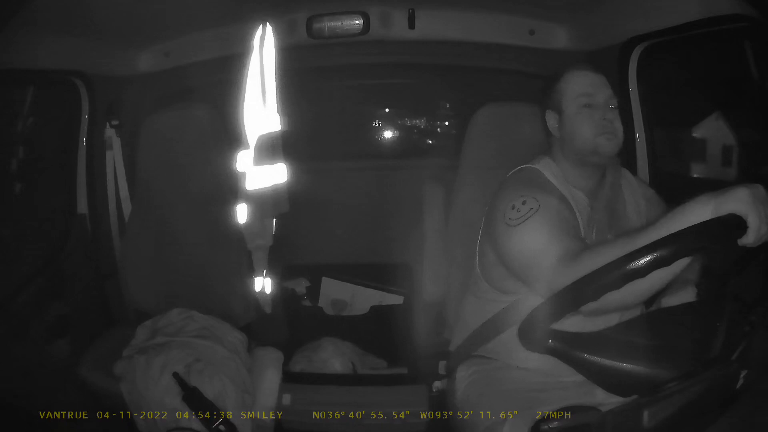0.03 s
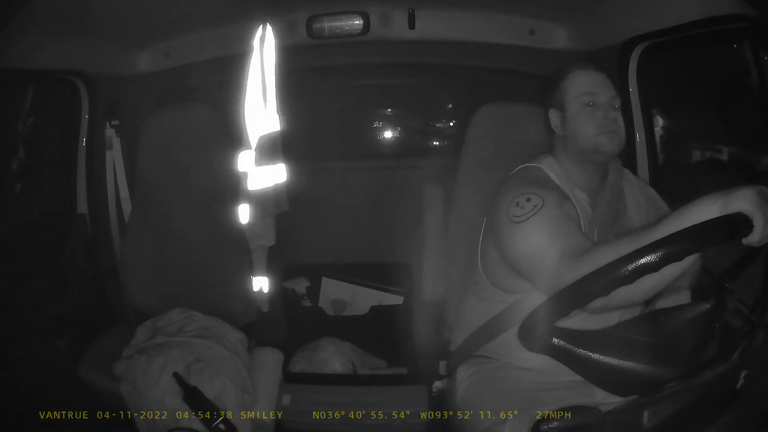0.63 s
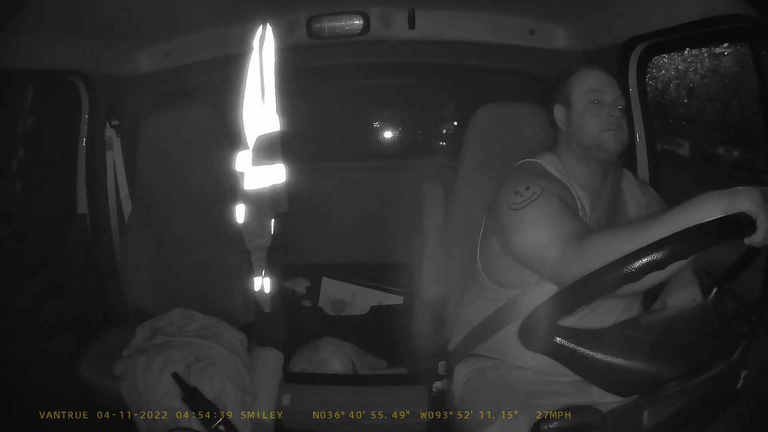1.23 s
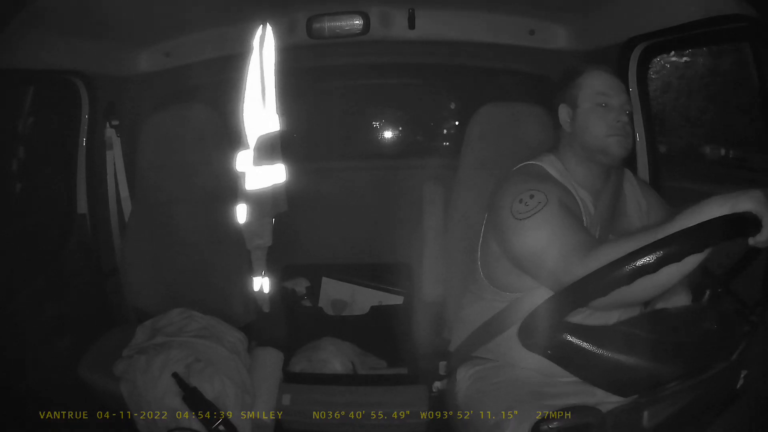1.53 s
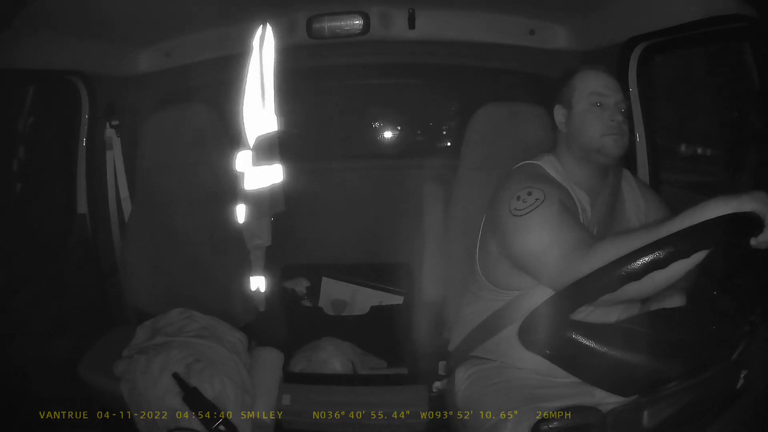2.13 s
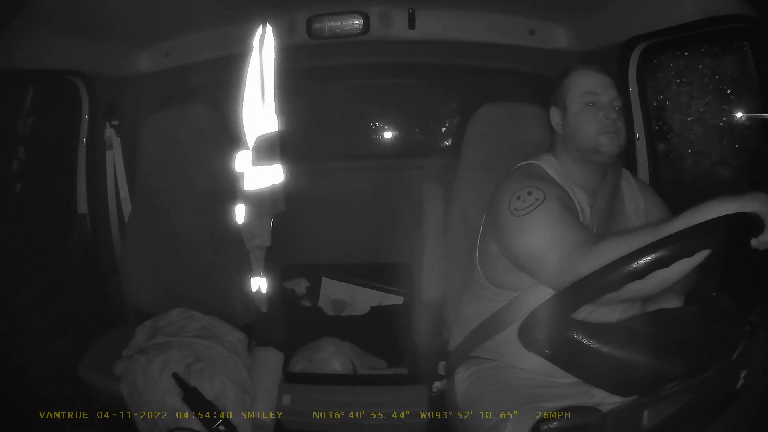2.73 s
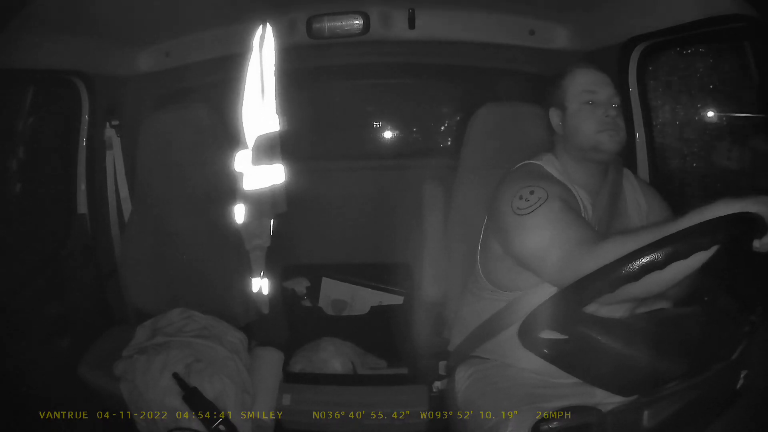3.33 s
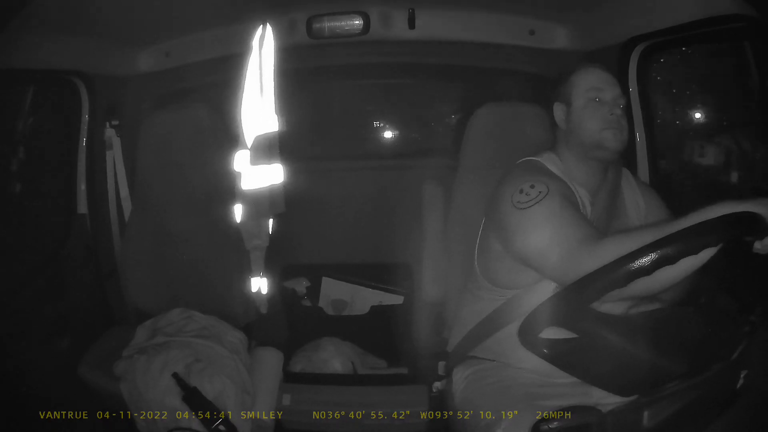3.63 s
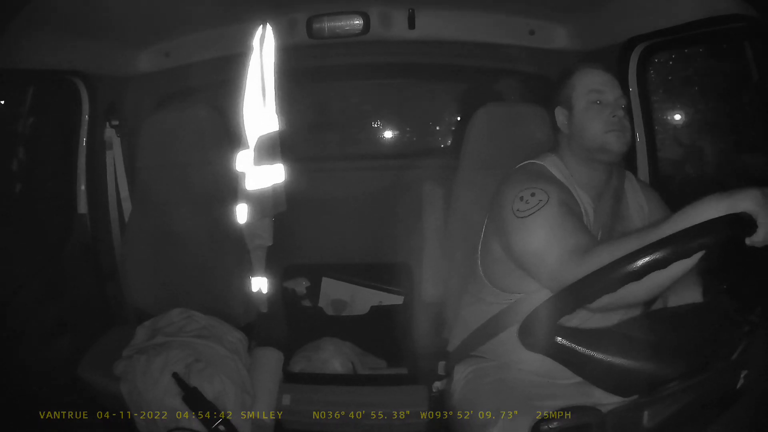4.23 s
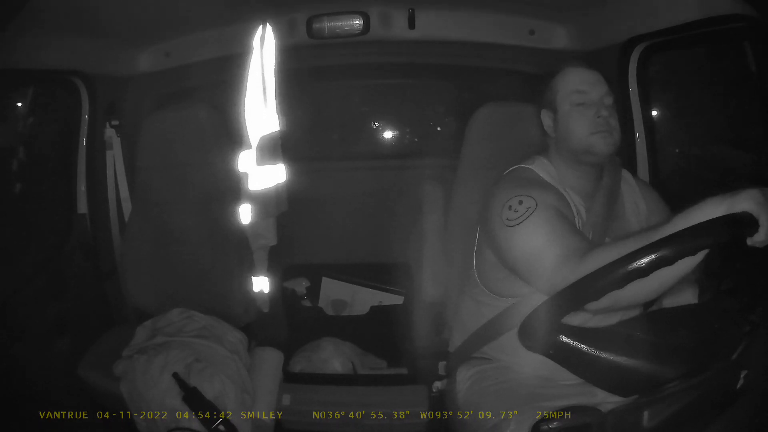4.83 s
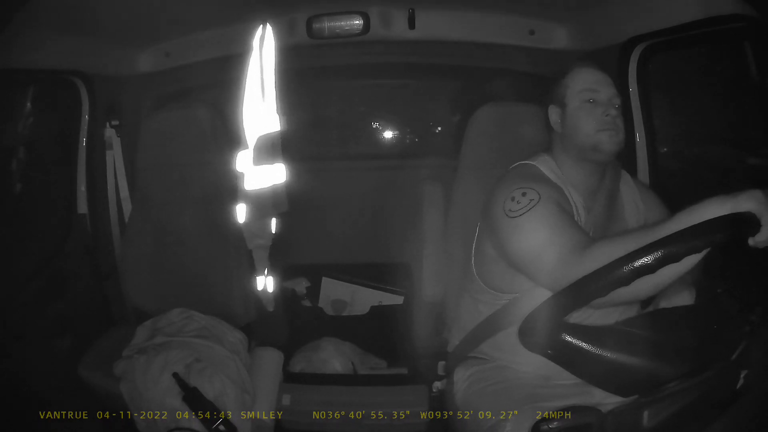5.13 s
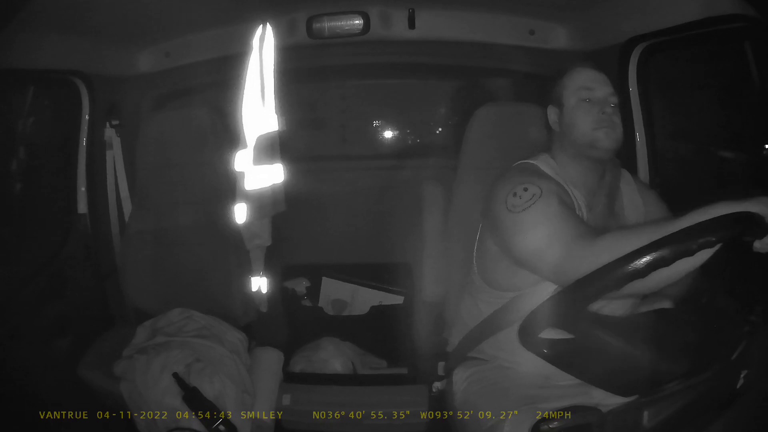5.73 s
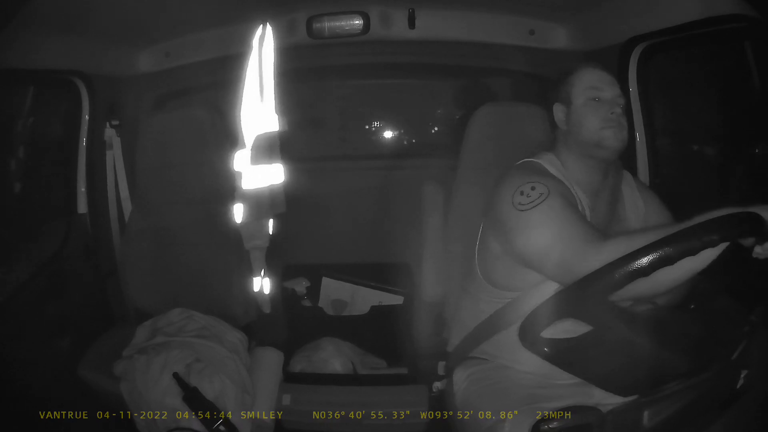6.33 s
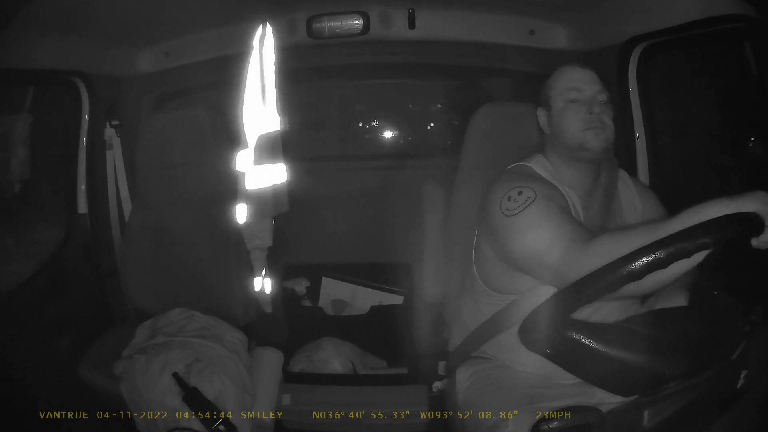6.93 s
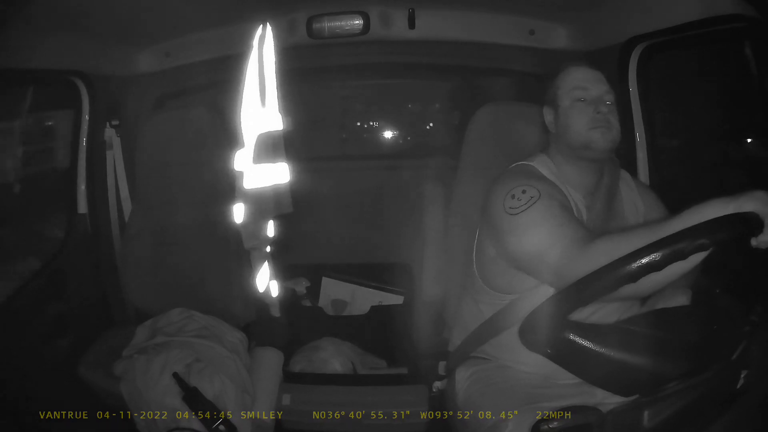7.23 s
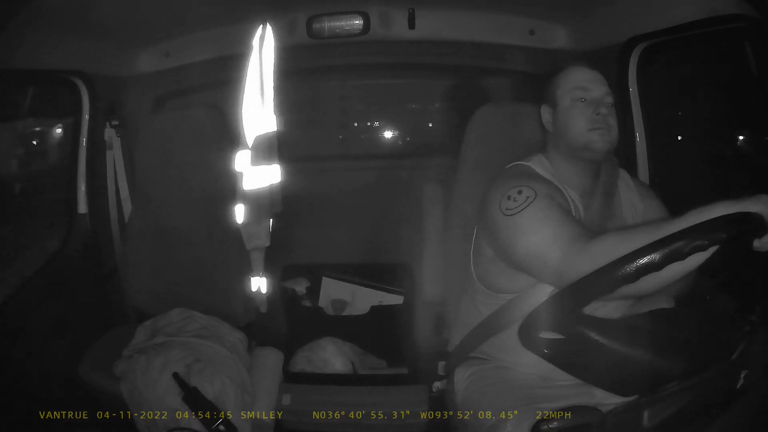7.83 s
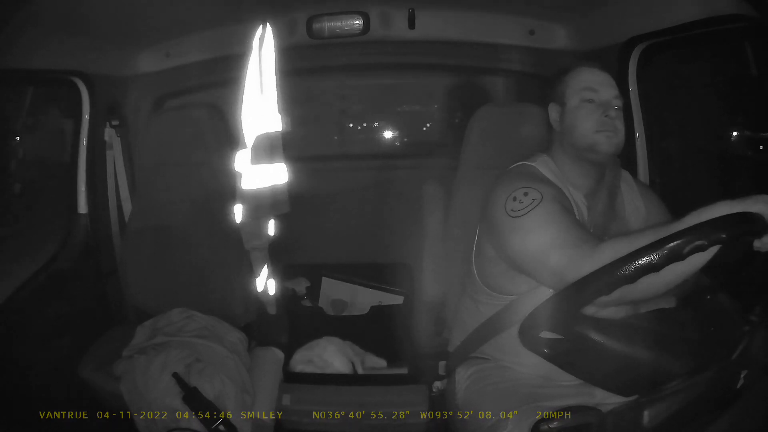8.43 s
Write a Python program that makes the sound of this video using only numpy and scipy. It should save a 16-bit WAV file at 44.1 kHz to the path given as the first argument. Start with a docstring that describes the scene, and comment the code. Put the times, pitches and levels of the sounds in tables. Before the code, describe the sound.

Inside a slowly moving diesel truck, a deep cab boom, a low engine drone and tyre roar with light hiss run for the whole eight and a half seconds. A turn signal goes tick-tock throughout, one dull click a little more often than every half second. Road bumps swell the rumble repeatedly, with the strongest thud at about 3 seconds. The engine note sags slightly, then steps up in a downshift at about 3.2 seconds and slowly falls afterwards. A small dry plastic knock comes at 2.9 seconds, a much sharper one at 3.3, and light ones near 7.3. Loose trim patters faintly all along, with tiny high squeaks around 0.5 and 8.2 seconds. At about 6.5 seconds the hiss and patter ease as the driver lifts off. A very faint blower hum lies underneath, and the space sounds close and padded.

```python
"""Truck cab in a night turn

Inside a diesel truck that rolls slowly through a turn and changes down one gear. The road makes
the cab boom under the engine's drone and the roar of the tyres; the turn signal goes tick-tock.
Loose trim patters, knocks and squeaks, and the hiss eases near the end as the driver lifts off."""
import sys
import numpy as np
from scipy import signal
from scipy.fft import rfft, irfft, next_fast_len
from scipy.io import wavfile
from scipy.ndimage import uniform_filter1d

SR = 44100
rng = np.random.default_rng(int(sys.argv[2]) if len(sys.argv) > 2 else 0)


def bounce(signal):
    """Save signal as a 16-bit WAV file at the path given by the first command-line argument."""
    frames = np.transpose(np.atleast_2d(signal))
    limited = np.clip(frames, -1, 1)
    pcm = np.round(limited * 32767).astype(np.int16)
    wavfile.write(sys.argv[1], SR, pcm)


N = 378819
TIME = np.arange(N) / SR

# Engine firing rate, jumping up at the downshift: t/s, f/Hz
FIRING_RATE = [(0, 60), (1, 59.54), (2, 58.03), (2.7, 56.3), (3.1, 54.55), (3.35, 76.26), (4.3, 74.8),
               (5, 73.8), (6, 70.4), (6.6, 66.04), (7.3, 61.85), (8, 59.13), (8.6, 59.75)]
# Bumps in the road: t/s, relative air boom/dB, relative frame thud/dB, length/s
ROAD_BUMPS = [(0.254, -35, -51, 0.13), (0.917, -32.5, -46, 0.18), (1.567, -31.5, -46, 0.15),
              (2.176, -31.0, -39, 0.2), (2.75, -30, -40, 0.099), (3.052, -29, -32.5, 0.18),
              (3.556, -35.0, -43, 0.14), (4.11, -36.5, -48, 0.24), (4.994, -32.5, -40, 0.1),
              (6.47, -35.5, -49, 0.23), (7.75, -32, -42.0, 0.18), (8.23, -31.5, -48, 0.14),
              (8.427, -31, -46.0, 0.14)]
# Spectrum of the bright hiss and squeak scrape: f/Hz, relative level/dB
HISS_EQ = [(1000, -9.5), (2250, -3), (2600, -1.5), (2820, -0.5), (2990, 2.5), (3250, -1.5), (3500, -1.5),
           (4100, -4.5), (5250, -8), (5600, -8), (6300, -14.5), (6900, -25.5), (10000, -36), (16000, -54)]
# Bright spectrum of brushing and knock cracks: f/Hz, relative level/dB
BRIGHT_EQ = [(1500, -5), (4000, 3), (7500, -3.5), (11000, -10), (16000, -12)]


def cab_rumble(shake_db, boom_trim_db=-1.43, panel_db=-46, thud_db=-51, jolt_trim_db=-3):
    """The road shakes the cab's air, frame and panels; the panels also follow the engine."""
    # Spectra of air boom, panel drone and frame thud: f/Hz, relative level/dB
    boom_eq = [(15, -33), (35, -27), (55, -28.5), (78, -17.5), (95, -20), (113, 1), (128, 4), (148, -2.5),
               (168, -6), (190, -22), (260, -46), (500, -76)]
    panel_eq = [(120, -15), (180, -6.5), (212, 1), (240, -1.5), (315, -1), (345, -5.5), (370, -4),
                (420, -9), (470, -13.5), (497, -16), (600, -19), (1200, -64)]
    thud_eq = [(20, -33), (55, -27), (85, -7.5), (108, 4.5), (120, -3), (140, -23), (300, -68),
               (1000, -120)]
    boom = noise(boom_eq)
    boom /= np.sqrt(uniform_filter1d(boom ** 2, size=2000))  # the road alone sets the slow swell
    load_db, revs_db = effort_db(), 20 * np.log10(curve(FIRING_RATE))
    engine_db = 0.2 * (load_db - load_db.mean()) + 0.57 * (revs_db - revs_db.mean())
    road_db = 0.22 * (shake_db - shake_db.mean())
    panels = noise(panel_eq) * gain_of(panel_db + road_db + engine_db + 0.76 * wander(25))
    jolts = swells([(s, db + jolt_trim_db, length) for s, _, db, length in ROAD_BUMPS])
    thud = noise(thud_eq) * np.hypot(gain_of(thud_db), jolts)
    return boom * gain_of(shake_db + boom_trim_db) + panels + thud


def road_shake_db(bed_db=-38.5, waver_db=2.8, bump_trim_db=-0.7):
    """How hard the road shakes the cab: a bed of unevenness with single bumps on top."""
    uneven = gain_of(bed_db + waver_db * wander(30))
    bumps = swells([(s, db + bump_trim_db, length) for s, db, _, length in ROAD_BUMPS])
    return 20 * np.log10(np.hypot(uneven, bumps))


def engine(gain_db=-49, waver_db=2.5):
    """Low orders of the six cylinders; each swells as it crosses the cab's boom."""
    # Engine orders: multiple of the firing rate, level/dB ahead of the cab's resonance
    orders = [(1 / 3, -1), (1, -1.5), (2, -3), (2.5, -7), (3, -10), (3.5, -2), (4, -13), (5, -12), (6, -8)]
    # The cab's resonance: f/Hz, gain/dB
    cab_eq = [(20, -18), (60, -12), (80, -2), (120, 0.5), (160, 11.5), (200, -1.5), (350, 0), (500, -12.5)]
    firing_hz = curve(FIRING_RATE)
    firings = np.cumsum(firing_hz * (1 + 0.003 * wander(10))) / SR
    drone = np.zeros(N)
    for order, db in orders:
        level = gain_of(db + eq_db(cab_eq, order * firing_hz) + waver_db * wander(6))
        drone += level * np.sin(2 * np.pi * (order * firings + rng.random()))
    return gain_of(gain_db) * drone


def effort_db(sink_db_per_s=0.24, lift_at_s=6.5, lift_length_s=0.16, lift_db=3):
    """The engine's effort sinks slowly from 0 dB, then drops as the driver lifts off."""
    lifted = np.clip((TIME - lift_at_s) / lift_length_s, 0, 1)
    return -sink_db_per_s * TIME - lift_db * lifted


def roar_and_hiss(roar_db=-50.5, hiss_db=-62, swell_db=0.5):
    """The tyres' roar and a bright hiss swell and flutter with the road's grain, and ease with the engine's
    effort."""
    # Spectrum of the tyre roar: f/Hz, relative level/dB
    roar_eq = [(400, -20), (495, -4.5), (525, 0.5), (600, 0), (690, -6.5), (765, -0.5), (800, -5),
               (850, -3), (930, -6), (1190, -7), (1510, -14), (2030, -15), (2230, -31), (3200, -44)]
    flutter = wander(45) + 0.65 * wander(130)
    swell = swell_db * wander(8)
    roar = noise(roar_eq) * gain_of(roar_db + 0.31 * effort_db() + swell + 1.37 * flutter)
    hiss = noise(HISS_EQ) * gain_of(hiss_db + effort_db() + 0.47 * swell + 1.06 * flutter)
    return roar + hiss * gain_of(1.26 * wander(150))


def turn_signal(first_s=0.1305, blink_s=0.8535):
    """The turn signal closes with a tick and opens with a tock half a blink later."""
    # Ringing modes of each stroke: f/Hz, relative level/dB, t60/s
    tick_modes = [(257, -14, 0.048), (465, -4, 0.1), (544, 6.5, 0.047), (627, -7.5, 0.041),
                  (840, -12, 0.028)]
    tock_modes = [(322, -5, 0.047), (456, 2, 0.055), (504, 7.5, 0.035), (582, -9, 0.055),
                  (967, -3.5, 0.032)]
    closes = np.arange(first_s, N / SR, blink_s)
    opens = np.arange(first_s + blink_s / 2, N / SR, blink_s)
    ticks = signal_clicks(closes, tick_modes, gain_db=-35.8, rise_s=0.0018, echo_s=0.0105, echo_db=-8)
    tocks = signal_clicks(opens, tock_modes, gain_db=-38.6, rise_s=0.003, echo_s=0.0135, echo_db=-6)
    return ticks + tocks


def signal_clicks(times, modes, gain_db, rise_s, echo_s, echo_db):
    """Ringing strokes, dulled by the dashboard and thrown back by the rear wall."""
    t = np.arange(SR // 6) / SR
    ring = sum(gain_of(db - 60 * t / t60) * np.sin(2 * np.pi * hz * t) for hz, db, t60 in modes)
    ring *= 1 - np.exp(-t / rise_s)
    clicks = np.zeros(N)
    for s in times:
        add(clicks, s, gain_of(gain_db) * ring)
        add(clicks, s + echo_s, gain_of(gain_db + echo_db) * ring)
    return cab_reverb(clicks, t60=0.26, wet_db=-15)


def trim_knocks(body_db=-34, body_t60=0.03, crack_db=-47, crack_t60=0.006):
    """Dry plastic knocks: a bright crack over a short burst coloured by the loose trim."""
    # Knocks: t/s, relative level/dB
    hits = [(2.882, -14), (3.3185, -0.5), (6.527, -23), (7.332, -21), (7.343, -14)]
    # The trim's resonance: f/Hz, relative level/dB
    trim_eq = [(300, -18), (750, -8), (1050, 14), (1500, -1), (2100, 4.5), (3000, -9.5), (4200, -14),
               (5500, -30), (7200, -39), (9000, -42), (15000, -44)]
    t = np.arange(4096) / SR
    blows, cracks = np.zeros(N), np.zeros(N)
    for s, db in hits:
        add(blows, s, rng.standard_normal(len(t)) * gain_of(body_db + db - 60 * t / body_t60))
        bright = coloured(rng.standard_normal(len(t)), BRIGHT_EQ)
        add(cracks, s, bright * gain_of(crack_db + db - 60 * t / crack_t60))
    body = coloured(blows, trim_eq) * blows.std()
    return cab_reverb(body + cracks, t60=0.11, wet_db=-9)


def trim_patter(clicks_per_s=160, spread_db=4, bed_db=-70, flurry_trim_db=3):
    """Many tiny rattles of loose trim, now and then swelling into a flurry."""
    # Flurries: t/s, relative level/dB, length/s
    flurries = [(.6, -61, .05), (1.37, -58.5, .03), (3.07, -64, .05), (4.785, -60, .03), (6.495, -63, .03)]
    # Spectrum of the rattle: f/Hz, relative level/dB
    rattle_eq = [(300, -14), (900, 3), (2000, 7.5), (2250, 3.5), (3000, 0.5), (5500, -15), (7000, -24),
                 (16000, -38)]
    strength = gain_of(spread_db * np.minimum(rng.exponential(1, N), 2)) * rng.choice([-1, 1], N)
    strikes = rng.random(N) < clicks_per_s / SR
    clicks = cab_reverb(strength * strikes, t60=0.011, wet_db=-2.5)
    level = gain_of(bed_db + effort_db()) + gain_of(flurry_trim_db) * swells(flurries)
    return coloured(clicks, rattle_eq) * level


def trim_squeaks(scrape_db=-10):
    """Short slips of the trim: a narrow tone with a little scrape."""
    # Slips: t/s, level/dB, f/Hz, length/s
    slips = [(0.513, -48, 2450, 0.012), (7.346, -55, 2430, 0.025), (8.196, -48.5, 2460, 0.023)]
    squeaks = np.zeros(N)
    for s, db, hz, length in slips:
        t = np.arange(0, length, 1 / SR)
        scrape = coloured(rng.standard_normal(4096), HISS_EQ)[:len(t)]
        tone = np.sin(2 * np.pi * hz * t) + gain_of(scrape_db) * scrape
        add(squeaks, s - length / 2, gain_of(db) * np.hanning(len(t)) * tone)
    return cab_reverb(squeaks, t60=0.085, wet_db=-9)


def brushing():
    """Brief, soft, bright brushing close by."""
    # Strokes: t/s, level/dB, length/s
    strokes = [(2.92, -62, 0.03), (6.143, -61, 0.022)]
    return swells(strokes) * noise(BRIGHT_EQ)


def blower(hz=259, level_db=-60):
    """The faint, wavering hum of the cab blower."""
    level = gain_of(level_db + 3.2 * wander(5.9))
    pitch_hz = hz * (1 + 0.004 * wander(12))
    return level * np.sin(2 * np.pi * np.cumsum(pitch_hz) / SR)


def cab_reverb(x, t60, wet_db):
    """Adds the dense, short reflections of a small padded cab."""
    t = np.arange(SR // 5) / SR
    tail = rng.standard_normal(len(t)) * gain_of(-60 * t / t60) * (t > 0.002)
    return x + gain_of(wet_db) * signal.oaconvolve(x, tail / np.linalg.norm(tail))[:N]


def gain_of(db):
    """Decibels to amplitude."""
    return 10 ** (np.asarray(db) / 20)


def unit_rms(x):
    """Scales to rms 1."""
    return x / np.sqrt(np.mean(x ** 2) + 1e-20)


def curve(rows):
    """An automation curve through rows of t/s, value."""
    return np.interp(TIME, *np.transpose(rows))


def swells(rows):
    """Bell-shaped envelopes from rows of t/s, level/dB, length/s."""
    return sum(gain_of(db) * np.exp(-(2 * (TIME - s) / length) ** 2) for s, db, length in rows)


def wander(rate):
    """Random drift at rms 1, with rate new values a second."""
    return unit_rms(np.interp(TIME * rate, np.arange(4000), rng.standard_normal(4000)))


def eq_db(eq, hz):
    """An EQ curve's gain at hz, interpolated on a log-frequency axis."""
    f, db = np.transpose(eq)
    return np.interp(np.log(hz + 1), np.log(f + 1), db)


def coloured(x, eq):
    """Shapes x with an EQ curve and scales it to rms 1."""
    size = next_fast_len(len(x))
    gains = gain_of(eq_db(eq, np.fft.rfftfreq(size, 1 / SR)))
    return unit_rms(irfft(rfft(x, size) * gains, size)[:len(x)])


def noise(eq):
    """Steady coloured noise at rms 1."""
    return coloured(rng.standard_normal(N), eq)


def add(mix, s, sound):
    """Mixes a sound in at time s."""
    part = mix[max(round(s * SR), 0):][:len(sound)]
    part += sound[:len(part)]


def scene():
    """Everything heard in the cab, in mono."""
    driving = cab_rumble(road_shake_db()) + engine() + roar_and_hiss()
    trim = trim_knocks() + trim_patter() + trim_squeaks()
    return (driving + turn_signal() + trim + brushing() + blower())[None]


def record(dry, hiss_db=-71.5, cutoff_hz=15820):
    """The microphone's own hiss, then a steep low-pass."""
    # Spectrum of the microphone hiss: f/Hz, relative level/dB
    mic_eq = [(100, -8), (7500, 0.5), (10000, -0.5), (16000, -2.5)]
    hiss = gain_of(hiss_db) * noise(mic_eq)
    low_pass = signal.firwin(511, cutoff_hz, window=("kaiser", 9), fs=SR)
    return signal.oaconvolve(dry + hiss, low_pass[None], "same")


dry = scene()
out = record(dry)
bounce(out)
```